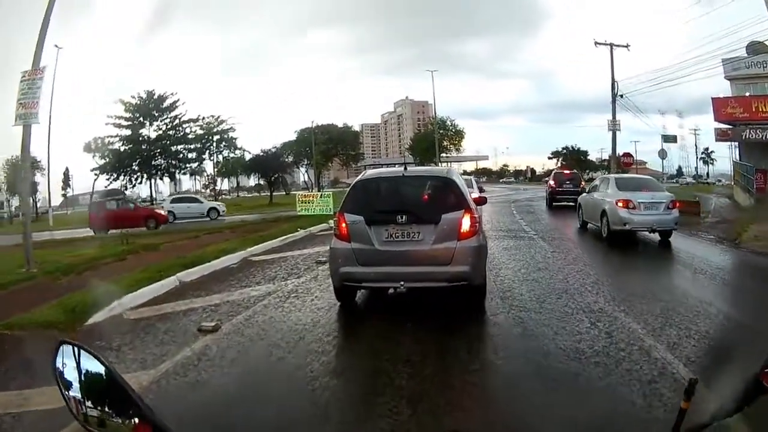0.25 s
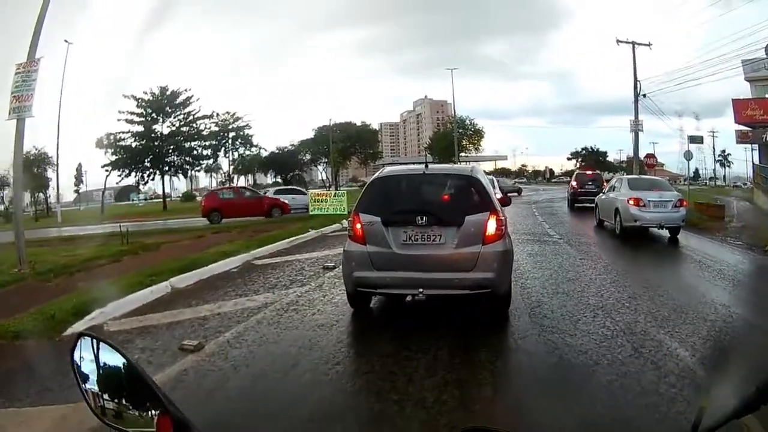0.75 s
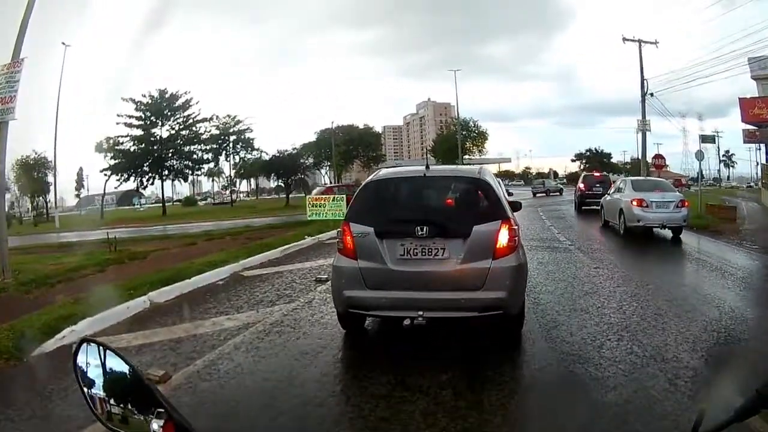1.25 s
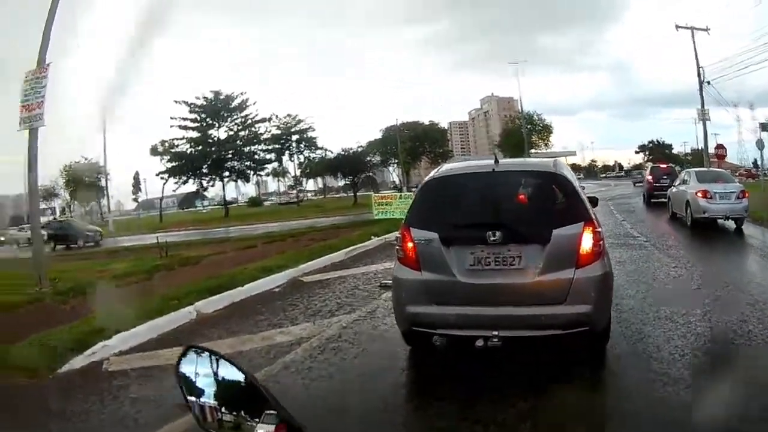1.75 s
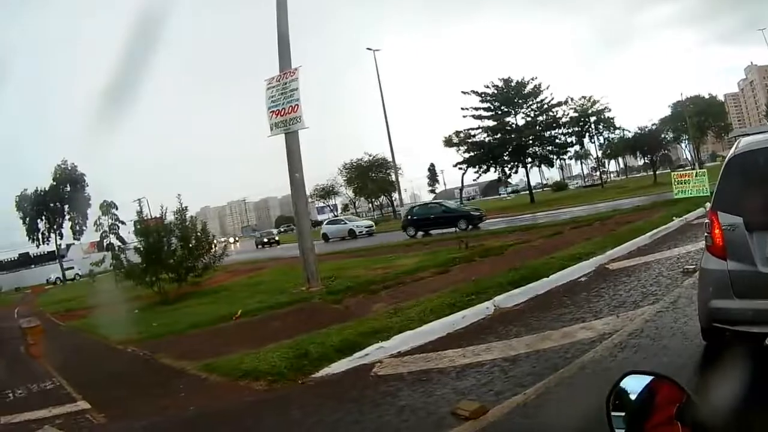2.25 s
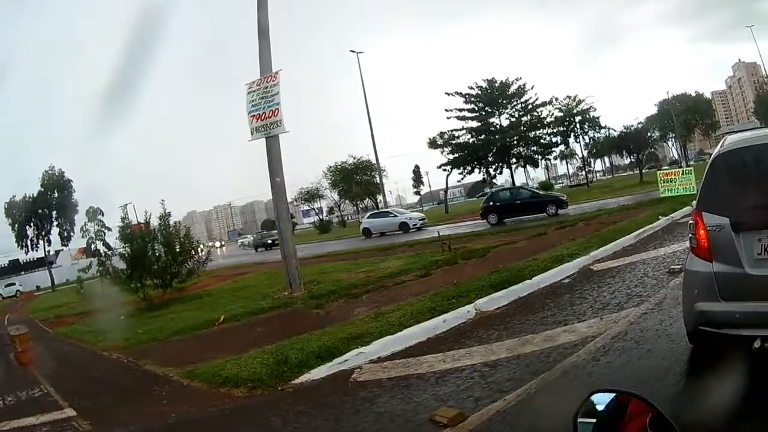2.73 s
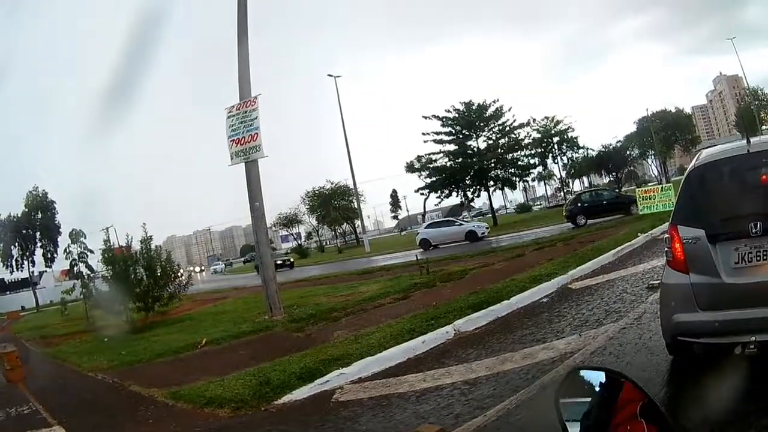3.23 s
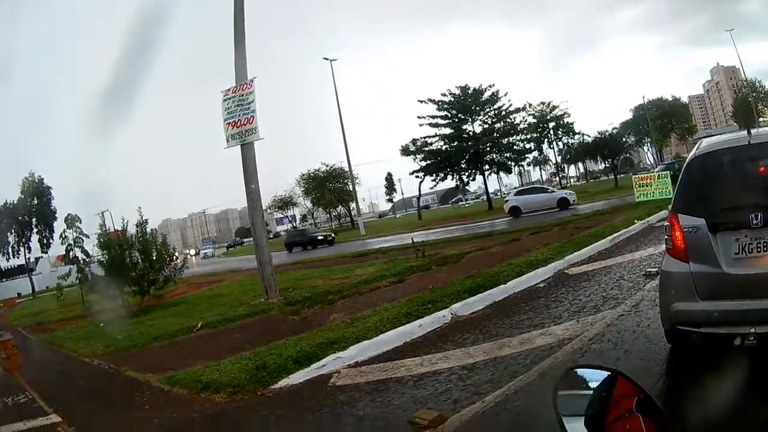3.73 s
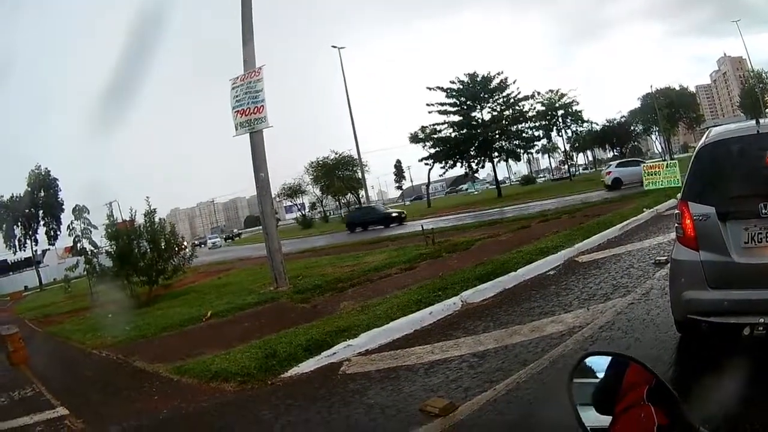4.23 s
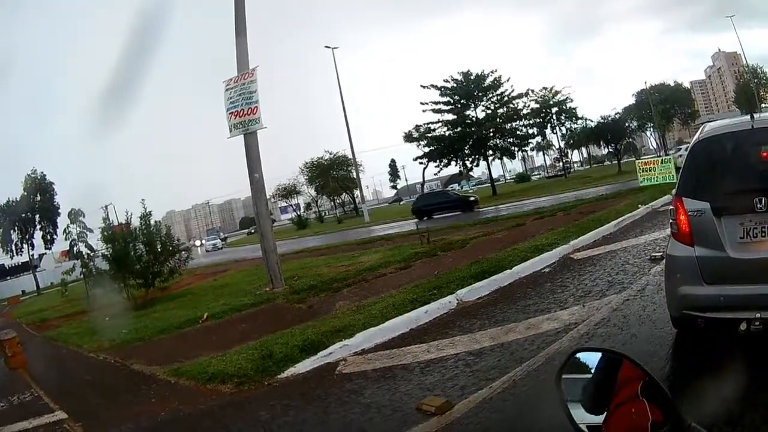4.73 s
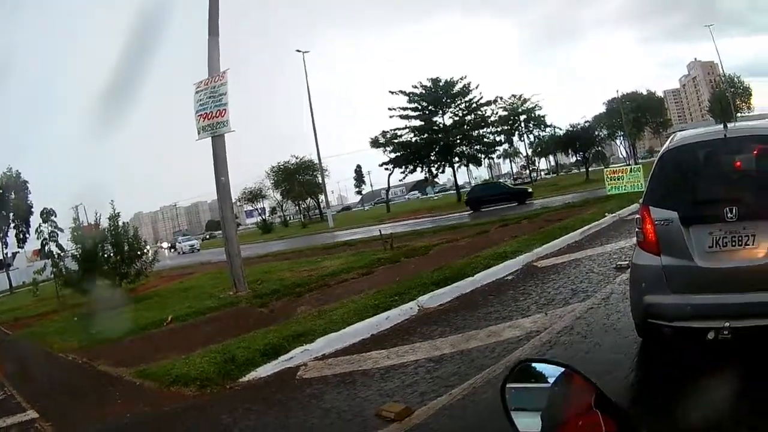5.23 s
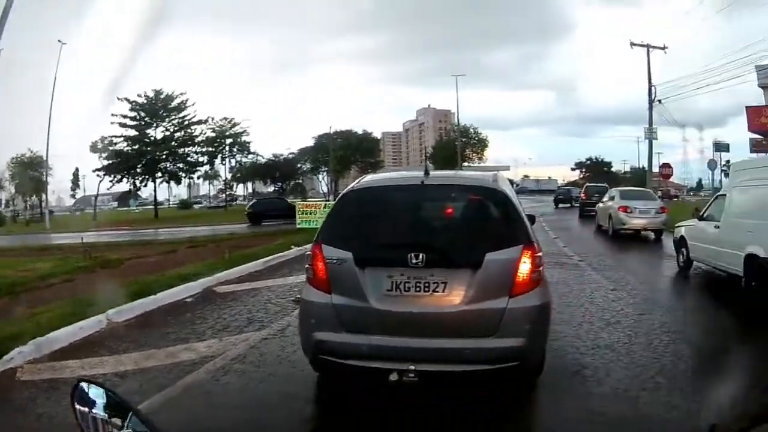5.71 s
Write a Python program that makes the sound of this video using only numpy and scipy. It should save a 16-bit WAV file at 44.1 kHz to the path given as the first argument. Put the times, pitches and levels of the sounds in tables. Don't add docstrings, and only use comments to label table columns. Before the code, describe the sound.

A close, boxy, bass-heavy sound from a microphone sealed in a camera case on a motorcyclist's helmet, waiting in wet traffic. Low wind rumble and muffled road drumming run throughout, with faint tyre hiss on the wet surface and light electronic hiss. From the start a heavy engine drones deep, climbing slowly in pitch, swelling and dipping, with a throbbing beat strongest around 2-3 s. Raindrops tick on the shell at 0.1 and 0.2 s, again from 1.0 to 1.55 s, the sharpest at 1.4 s. At 1.87 s comes a soft bump, then at 2.0 s one loud hollow knock with a brief low swing, followed by padding rustle. Afterwards it is calmer, with weak ticks near 3.2, 4.5 and 5.0 s. The heavy engine fades around 5 s as a steady idle surfaces, strongest at the end; a faint car accelerates past near 5.15 s. A clearer tick and thump at 5.27 s precede soft rubs at 5.4 s.

```python
import sys
import numpy as np
from scipy import signal
from scipy.fft import rfft, irfft, next_fast_len
from scipy.io import wavfile
from scipy.ndimage import uniform_filter1d, map_coordinates

SR = 44100
rng = np.random.default_rng(int(sys.argv[2]) if len(sys.argv) > 2 else 0)


def gain_from_db(level_db):
    decades = np.asarray(level_db, float) / 20
    return 10 ** decades


def store_pcm(level_fs):
    pcm = np.round(np.clip(level_fs, -1, 1) * 32767).astype(np.int16)
    wavfile.write(sys.argv[1], SR, np.atleast_2d(pcm).T)


N = 263277


def unit(x):
    return x / np.sqrt(np.mean(x ** 2) + 1e-20)


def along(points, hz):
    f, v = np.transpose(points)
    return np.interp(np.log(hz + 1), np.log(f + 1), v)


def curves(rows):
    s, *columns = np.transpose(rows)
    return [np.interp(np.arange(N) / SR, s, column) for column in columns]


def wobble(rate):
    return map_coordinates(rng.standard_normal(N // 400), [np.arange(N) * rate / SR])


def shaped(x, gain_db):
    m = next_fast_len(N + 8192)
    return irfft(rfft(x, m) * gain_from_db(gain_db(np.fft.rfftfreq(m, 1 / SR))), m)[:N]


def rush(colour_db, patchy_db):
    z = signal.stft(rng.standard_normal(N + 512), nperseg=512)[2]
    field = uniform_filter1d(rng.standard_normal(z.shape), size=6, axis=0)
    field = uniform_filter1d(field, size=10, axis=1)
    patchy = signal.istft(z * gain_from_db(patchy_db * unit(field)), nperseg=512)[1][:N]
    return unit(shaped(patchy, colour_db))


def ring(t, hz, db, t60, rise):
    envelope = gain_from_db(db - 60 * t / t60) * (1 - np.exp(-t / rise))
    return envelope * np.sin(2 * np.pi * hz * t)


def burst(hz, width_hz, length):
    n = max(round(length * SR), 16)
    f = np.fft.rfftfreq(8192, 1 / SR)
    band = np.exp(-((f - hz) / (1.5 * width_hz)) ** 4)
    noise = unit(irfft(rfft(rng.standard_normal(8192)) * band)[:n])
    return noise * np.sin(np.pi * np.sqrt(np.arange(n) / n)) ** 2


def engine(hz, db, span, orders, line, uneven_db):
    t = np.arange(N) / SR
    fade_s = .3
    near = np.clip(np.minimum(t - span[0] + fade_s, span[1] + fade_s - t) / fade_s, 0, 1)
    turn = 2 * np.pi * np.cumsum(hz) / SR / line
    slow_db = uniform_filter1d(db, size=SR // 2)
    level = gain_from_db(db + .3 * uneven_db * wobble(9))
    x = level * np.sin(line * turn + .1 * uneven_db * wobble(7))
    for k, rel_db in orders:
        level = gain_from_db(slow_db + rel_db + uneven_db * wobble(4.6))
        phase = 2 * np.pi * rng.random() + 0.14 * wobble(2.7)
        x = x + level * np.sin(round(k) * turn + phase)
    return np.sqrt(2) * near * x


def heavy_engine():
    # time in seconds, level in dB, share of the neighbour it beats with (0-1).
    heavy = [(0, -30, 0.7), (.4, -36.5, 0), (.75, -31.5, 0.16), (1.1, -34.5, 0.05), (1.22, -42, 0.25),
             (1.35, -33, 0.32), (1.62, -37, .4), (1.85, -45, 0.3), (2.1, -33, 1), (2.7, -35, .8),
             (2.95, -34.5, 0.55), (3.15, -42.5, 0.4), (3.55, -36.5, 0.2), (3.9, -44.5, 0.6),
             (4.1, -39, 0.2), (4.47, -36, 0), (4.65, -49.5, 0), (4.9, -37, 0)]
    # multiple of the cycle rate, level in dB relative to the firing line.
    heavy_orders = [(4, -12), (6, -18), (8, -17)]
    start_hz, top_hz, settle_s = 58.54, 74.53, 2.9
    beat_hz, beat_peak_s = 3.66, 2.128
    t = np.arange(N) / SR
    firing_hz = top_hz - (top_hz - start_hz) * np.exp(-t / settle_s)
    level_db, share = curves(heavy)
    throb = np.abs(1 + np.clip(share, 0, .95) * np.exp(2j * np.pi * beat_hz * (t - beat_peak_s)))
    level_db = level_db + 20 * np.log10(throb)
    return engine(firing_hz, level_db, (0, heavy[-1][0]), heavy_orders, line=5, uneven_db=4)


def idling_engine():
    # time in seconds, level in dB.
    idle = [
        (3.2, -56),
        (3.7, -44),
        (4.04, -55),
        (4.35, -42.5),
        (4.7, -50),
        (5.1, -39),
        (5.4, -35),
        (5.62, -49.5),
        (5.902, -31),
    ]
    # multiple of half the firing line, level in dB relative to the line.
    idle_orders = [(3, -10)]
    span = (idle[0][0], idle[-1][0])
    return engine(np.full(N, 60.9), *curves(idle), span, idle_orders, line=2, uneven_db=4)


def passing_car():
    nearest_s, nearest_hz, gains_hz_per_s = 5.15, 128, 7
    nearest_db, pass_s = -49.5, .55
    away_s = np.arange(N) / SR - nearest_s
    car_db = nearest_db - 20 * np.log10(1 + (away_s / pass_s) ** 2)
    return engine(nearest_hz + gains_hz_per_s * away_s, car_db, (4.5, 5.9), [], line=1, uneven_db=5)


def knock():
    # delay in seconds, pitch in Hz, peak in dB, 60 dB decay in seconds, rise in seconds.
    cavity_modes = [(.0005, 428, -3, .029, .006), (0, 296, -11.7, .017, .0005)]
    # delay in seconds, pitch in Hz, peak in dB, 60 dB decay in seconds.
    mount_swings = [
        (.0011, 125, -10, .032),
        (.0117, 64.5, -4.6, .08),
        (.0347, 46, -19, .22),
    ]
    # pitch in Hz, peak in dB, 60 dB decay in seconds.
    edge_modes = [(690, -36.5, 0.031), (1190, -29, 0.0056), (1870, -36, 0.013), (2200, -69, 0.0081)]
    rise_turns = .36
    t = np.arange(N) / SR - 1.9903
    cavity = sum(ring(np.maximum(t - late, 0), hz, db, t60, rise) for late, hz, db, t60, rise in cavity_modes)
    mount = np.zeros(N)
    for k, (late, hz, db, t60) in enumerate(mount_swings):
        mount += (-1) ** k * ring(np.maximum(t - late, 0), hz, db, t60, rise_turns / hz)
    edge = sum(ring(np.maximum(t, 0), hz, db, t60, .0006) for hz, db, t60 in edge_modes)
    return mount - cavity - edge


def drops():
    # start in seconds, shell ring peak in dB, spatter level in dB, spatter centre in Hz,
    # rim ping peak in dB.
    hits = [(0.081, -58, -72.5, 4300, -80), (0.1979, -33.5, -64, 3400, -70), (.9840, -54, -61.5, 4000, -58),
            (1.2248, -57, -70, 3300, -57), (1.3798, -70, -67.5, 6000, -70), (1.3804, -22.5, -64, 3800, -58),
            (1.541, -59, -66.5, 3800, -60), (1.547, -48.5, -67.5, 2200, -80), (1.9893, -64, -70, 3980, -70),
            (3.234, -54, -73, 2300, -80), (4.508, -53, -71, 3200, -80), (4.956, -62, -74, 4200, -75),
            (5.2700, -56, -64, 3500, -48)]
    # pitch in Hz, level in dB, 60 dB decay in seconds.
    shell_modes = [(1267, -3, 0.021), (1515, -0.5, 0.023), (2070, -23, 0.015), (2580, -25.5, 0.019),
                   (3300, -29.5, 0.024)]
    out, t = np.zeros(N + SR), np.arange(SR // 10) / SR
    for s, shell_db, spatter_db, spatter_hz, rim_db in hits:
        i = round(s * SR)
        shell = sum((-1) ** k * ring(t, hz, shell_db + db, t60, 0.00063)
                    for k, (hz, db, t60) in enumerate(shell_modes))
        rim = ring(t, 4350, rim_db, t60=.018, rise=0.0018)
        spatter = gain_from_db(spatter_db + 3.5) * burst(spatter_hz, 0.16 * spatter_hz, length=0.0066)
        splash = gain_from_db(spatter_db + 8) * burst(1150, width_hz=300, length=.014)
        for part in (shell + rim, spatter, splash):
            out[i:i + len(part)] += part
    return out[:N]


def cavity_thumps():
    # start in seconds, peak in dB.
    taps = [
        (1.227, -46),
        (1.3802, -54),
        (1.547, -32.5),
        (1.871, -38.5),
        (3.241, -48),
        (5.2722, -37),
    ]
    out, t = np.zeros(N + SR), np.arange(SR // 10) / SR
    for s, cavity_db in taps:
        out[round(s * SR):][:len(t)] += ring(t, 432, cavity_db, t60=0.067, rise=0.0066)
    return out[:N]


def rubs():
    # start in seconds, length in seconds, centre in Hz, level in dB.
    touches = [(1.861, 0.038, 312, -47), (1.9893, .007, 2000, -54), (2.028, .045, 3900, -69),
               (2.029, 0.056, 1800, -65.5), (2.038, .035, 418, -47.5), (2.07, .1, 4300, -77.5),
               (2.085, .09, 413, -47), (0.199, .02, 700, -61), (5.368, 0.031, 430, -52),
               (5.398, .06, 423, -47.5), (5.4, 0.064, 730, -59.5), (5.438, .035, 600, -57)]
    out = np.zeros(N + SR)
    for s, length, hz, db in touches:
        x = gain_from_db(db) * burst(hz, 0.14 * hz, length)
        out[round(s * SR):][:len(x)] += x
    return out[:N]


def case_db(hz):
    # centre in Hz, width in Hz, gain in dB.
    resonances = [(440.4, 82, 14), (1262, 208, 14), (1452, 120, -7.5), (1654, 310, 9), (2400, 460, 3.5),
                  (3350, 250, 3.5), (4630, 650, 0)]
    return sum(db / (1 + ((hz - c) / (w / 2)) ** 2) for c, w, db in resonances)


def wind_and_road():
    # frequency in Hz, density in dB per Hz.
    rumble_colour = [(15, -16), (25, -9), (32, -6), (40, -4), (52, 0), (66, 0), (80, -3), (100, -7),
                     (125, -15), (160, -26), (300, -60), (600, -130)]
    drum_colour = [(60, -36), (130, -1.5), (200, -0.5), (350, -5.5), (500, -15.5), (800, -20), (1100, -31),
                   (2000, -70)]
    spray_colour = [(300, -32), (700, -4.5), (1100, -1), (2000, -8.5), (2900, -14), (4000, -16),
                    (5500, -29), (8000, -41.5), (12000, -68.5)]
    # time in seconds, level in dB over its mean.
    traffic = [
        (0, 0),
        (1, 0),
        (2, .5),
        (2.5, 0),
        (4, 0),
        (5.1, .5),
        (5.97, 0),
    ]
    traffic_db, = curves(traffic)
    gust = wobble(1.925)
    rumble_db = -37.5 - .3 * np.arange(N) / SR + .5 * gust
    rumble = gain_from_db(rumble_db) * rush(lambda hz: along(rumble_colour, hz), patchy_db=3.0)
    drum_db = -54 + 1.7 * traffic_db + 0.34 * gust + 0.88 * wobble(12)
    drum = gain_from_db(drum_db) * rush(lambda hz: along(drum_colour, hz) + case_db(hz), patchy_db=0.05)
    spray_db = -62 + traffic_db + 0.22 * wobble(12)
    spray = gain_from_db(spray_db) * rush(lambda hz: along(spray_colour, hz) + case_db(hz), patchy_db=0.67)
    return rumble + drum + spray


def preamplifier_hiss():
    # frequency in Hz, density in dB per Hz.
    hiss_colour = [(2000, -5), (5000, 0), (7500, -5), (10000, -4.5), (12500, -5), (15400, -1),
                   (16500, -58.5)]
    return gain_from_db(-79.5) * rush(lambda hz: along(hiss_colour, hz), patchy_db=0.2)


def scene():
    engines = heavy_engine() + idling_engine() + passing_car()
    on_the_case = knock() + drops() + cavity_thumps() + rubs()
    return (engines + on_the_case + wind_and_road())[None]


def roll_off(x):
    return signal.sosfilt(signal.butter(12, 15760, fs=SR, output="sos"), x)


def record(dry):
    top_hz = 15500
    m = next_fast_len(N + 8192)
    held = np.pad(dry + preamplifier_hiss(), ((0, 0), (0, m - N)), mode="reflect")
    limited = irfft(rfft(held) * (np.fft.rfftfreq(m, 1 / SR) < top_hz), m)[:, :N]
    return roll_off(limited)


dry = scene()
out = record(dry)
store_pcm(out)
```